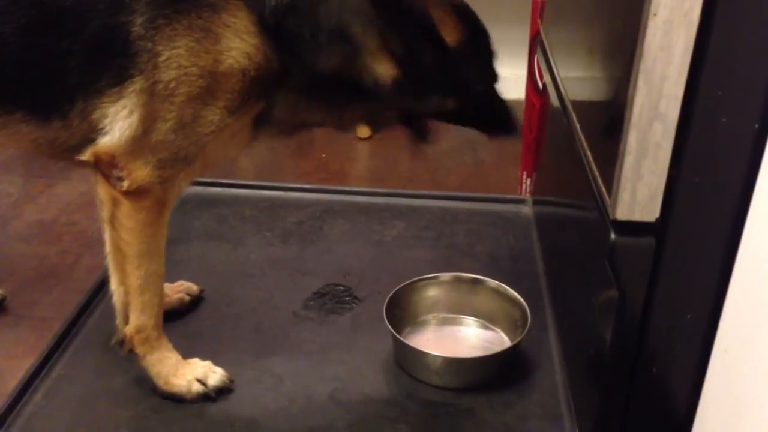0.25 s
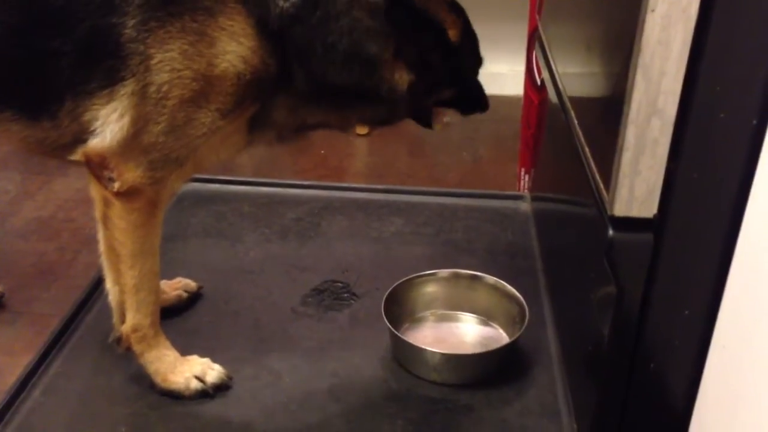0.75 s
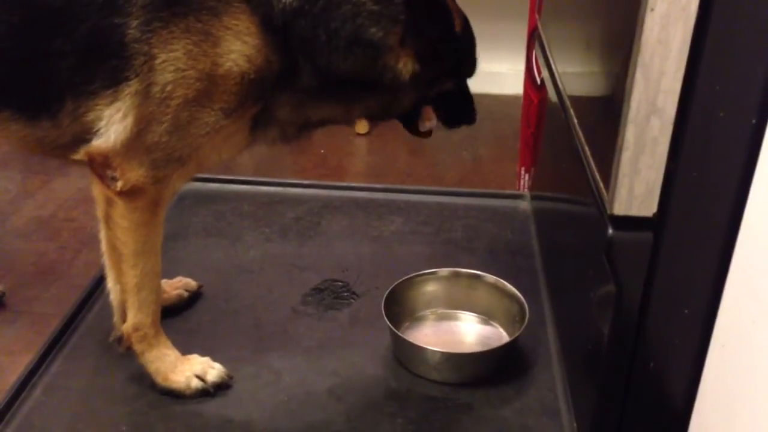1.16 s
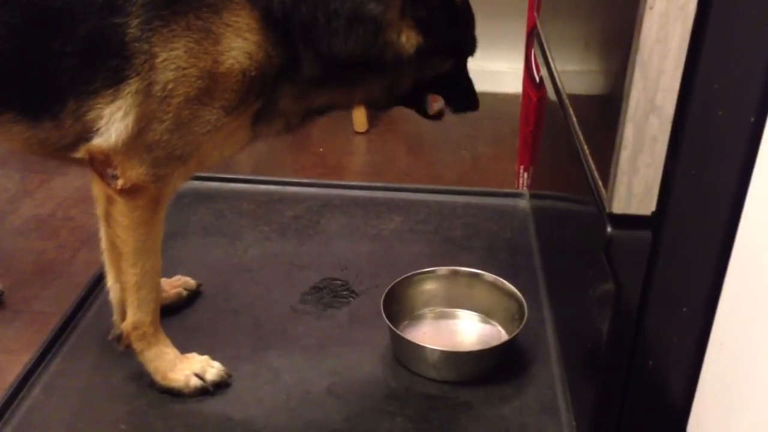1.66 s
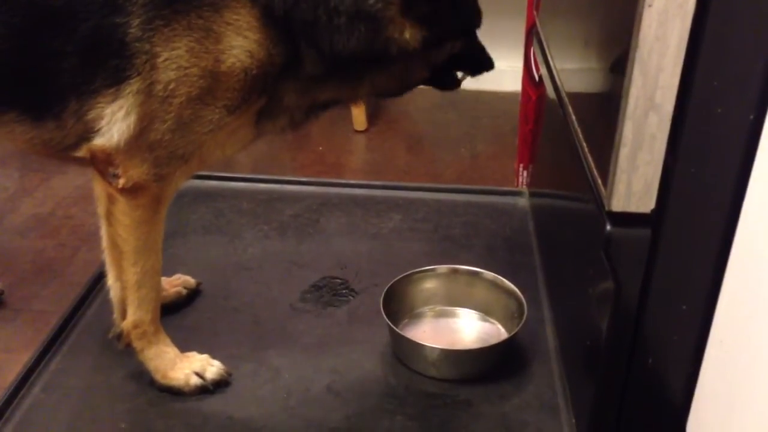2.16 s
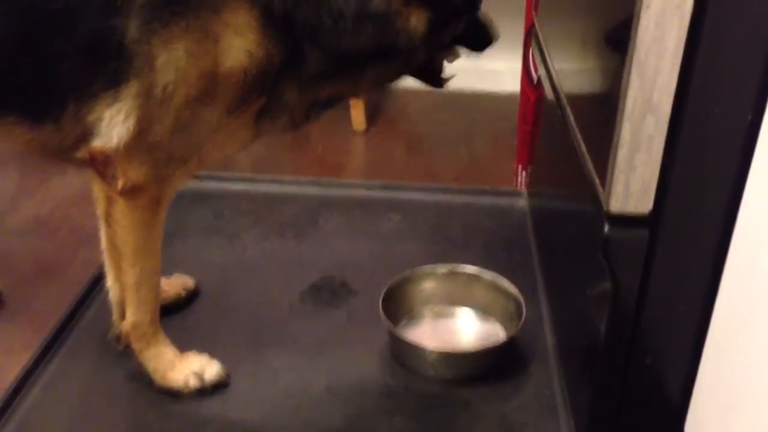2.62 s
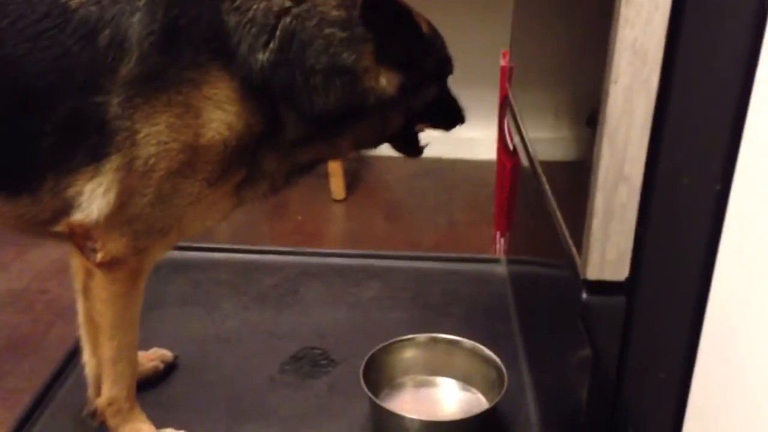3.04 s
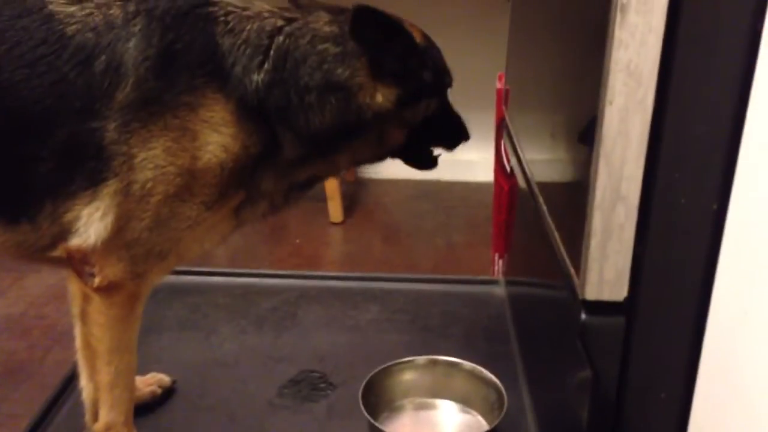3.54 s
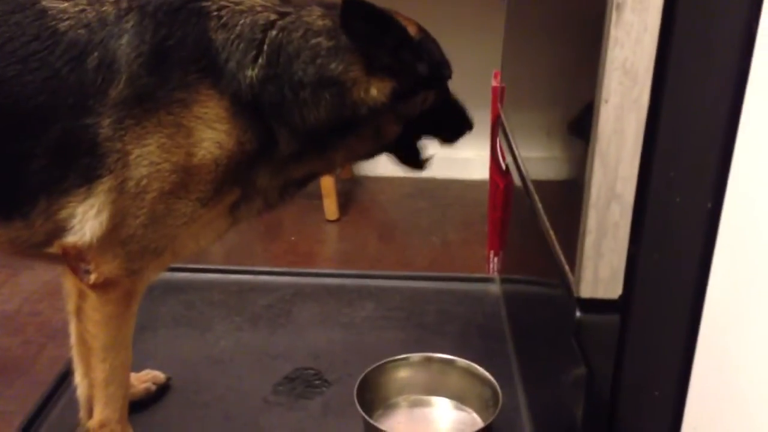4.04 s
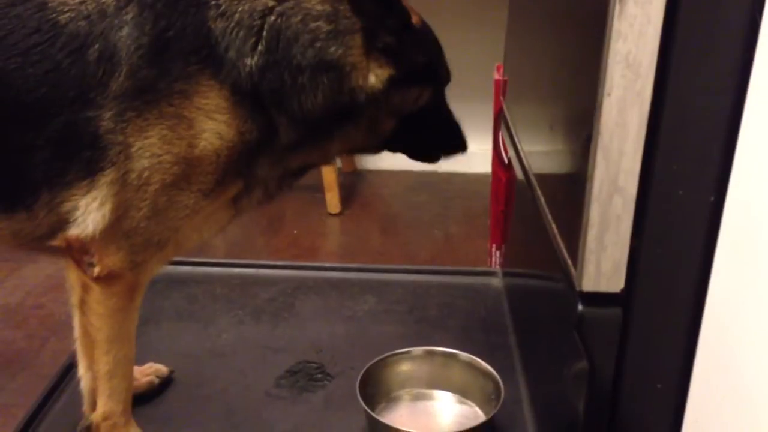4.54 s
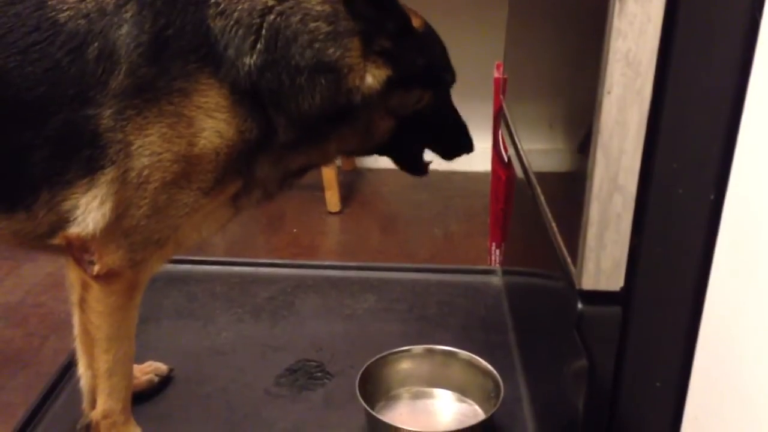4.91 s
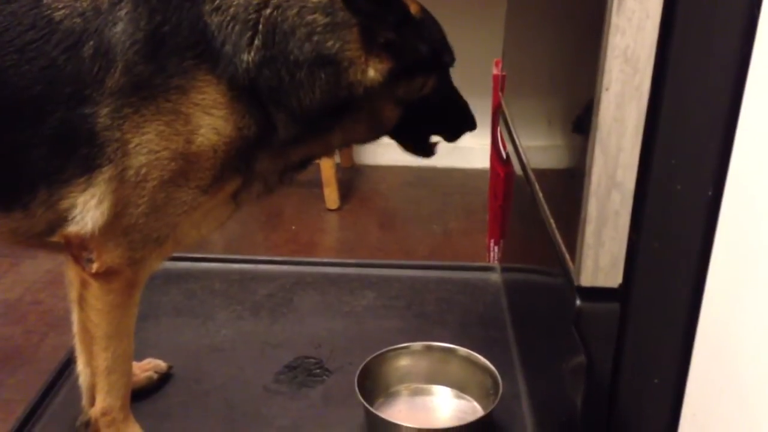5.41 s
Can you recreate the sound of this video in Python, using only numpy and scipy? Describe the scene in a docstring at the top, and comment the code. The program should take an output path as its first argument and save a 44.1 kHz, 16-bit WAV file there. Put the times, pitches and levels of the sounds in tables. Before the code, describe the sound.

A dog chews raw chicken close to the microphone in a small room with little echo. A soft, steady airy hum from a household appliance lies underneath throughout. Faint wet chewing opens, then at about 0.8 seconds bone starts to crack, peaking just before 1 second in the loudest crunch, with a dull thud of the jaws. Quiet saliva smacks follow, with a pop and a small crunch around 2.1 to 2.3 seconds. A strong cluster of splintering cracks comes from 2.7 to 2.9 seconds. Soft chewing and faint ticks near 3.3 seconds lead to another sharp crunch at 3.8. After a short lull, a wet pop and a lighter, squelchy bite arrive between 4.9 and 5.1 seconds. Around 5.6 seconds come a few suction pops of tongue and lips with one last soft bite.

```python
"""Dog chewing raw chicken

Close up in a small, quiet room, bones crunch in bursts of tiny fractures that ring the splinter and
the open mouth. The jaws thud shut on the meat; saliva fizzes and pops between bites.
Underneath sits a steady bed of air noise and mains hum from a household appliance."""
import sys
import numpy as np
from scipy import signal
from scipy.fft import rfft, irfft
from scipy.io import wavfile

SR = 44100
rng = np.random.default_rng(int(sys.argv[2]) if len(sys.argv) > 2 else 0)


def persist_wave(psi):
    """Save psi, clipped to +-1, as 16-bit WAV."""
    counts = np.round(np.clip(psi, -1, 1) * 32767).astype(np.int16)
    wavfile.write(sys.argv[1], SR, np.atleast_2d(counts).T)


N = 250488
HIT = 4096  # samples in a one-shot

# tone of the appliance's air noise: (frequency [Hz], relative level [dB])
AIR_SPECTRUM = [(18, -60), (30, -32), (75, -21), (108, -12), (249, -3), (379, -9), (410, -3.5), (709, -11),
                (787, -12), (1230, -14), (1330, -12.5), (1970, -16), (3070, -21.5), (4090, -22),
                (15500, -38)]
# resonant bumps and dips in that air noise: (centre [Hz], width [Hz], gain [dB])
AIR_RESONANCES = [(81, 30, -4.5), (116, 14, 1.5), (153.5, 33, 2), (291, 143, 3), (495, 187, -6),
                  (614, 44, 5), (880.5, 27, 6), (1229, 36, 7), (1890, 200, 2.5)]
# light chewing strokes and wet smacks: (middle [s], length [s], level [dB], pocket pitch [Hz])
CHEW_STROKES = [ (.18, .25, -67, 6000), (0.334, 0.077, -58.5, 3850), (0.618, 0.1, -61, 4000),
                (.75, 0.033, -54, 1590), (1.382, 0.035, -59.5, 6800), (1.60, 0.073, -55, 5700),
                (1.91, 0.15, -64.5, 5500), (2.25, 0.13, -57, 7400), (2.30, .045, -46.5, 3460),
                (2.321, .007, -51, 14400), (2.665, .14, -62, 4500), (3.214, .29, -63, 4500),
                (3.518, .15, -64, 4000), (4.508, .15, -70, 6500), (4.965, 0.2, -59.5, 4140), ]
# bone breaks: (time [s], length [s], snap level [dB], mouth pitch [Hz], mouth level [dB],
# splinter pitch [Hz], splinter level [dB])
BONE_CRACKS = [ (0.810, .004, -43, 1610, -47.5, 5000, -47.5), (0.891, 0.0064, -40, 1670, -52, 4300, -40),
               (0.8959, 0.005, -34, 1700, -39.5, 5030, -36), (0.9429, 0.0026, -25, 1040, -46, 8700, -29.5),
               (0.945, 0.0027, -22, 1063, -32, 4900, -35), (0.9474, 0.0029, -33, 2010, -30, 2680, -28),
               (1.016, 0.0055, -32.5, 1560, -44.5, 2980, -57), (2.181, 0.003, -49, 1840, -56, 3520, -59),
               (2.225, 0.0083, -46, 1290, -65, 3830, -50), (2.238, .005, -41, 1250, -67, 3850, -47),
               (2.721, 0.0024, -42, 1210, -50.5, 4770, -37.5), (2.765, 0.0094, -51, 1720, -41, 3130, -39.5),
               (2.825, 0.0074, -36, 1105, -38, 1720, -41.5), (2.848, 0.0081, -30, 1274, -32, 2450, -40),
               (2.86, 0.019, -36, 1150, -40.5, 1760, -41), (2.88, 0.0017, -50, 963, -38.5, 3000, -46),
               (3.271, 0.0088, -50, 1150, -51.5, 3670, -73), (3.353, 0.014, -55.5, 1510, -57, 3080, -59),
               (3.7853, 0.0061, -48, 1000, -47, 4600, -36), (3.835, 0.0065, -32.5, 968, -23.5, 4040, -48),
               (3.8536, 0.0038, -37.5, 940, -42, 2020, -45), (4.979, 0.0012, -49, 1940, -52, 4400, -68),
               (5.0502, 0.0083, -44.5, 1606, -41, 4500, -47), (5.054, 0.0036, -49, 695, -39.5, 3930, -39),
               (5.615, 0.006, -56, 990, -39, 2670, -57), ]
# colour of a fracture: (frequency [Hz], gain [dB])
SNAP_SPECTRUM = [(150, -25), (550, -6), (900, 1.5), (1500, -2), (2200, 5.5), (3300, 7), (5400, 4.5),
                 (7000, 3), (8400, 0.5), (9500, 0), (11500, -1), (16000, 10)]
# full bites: (time [s], thud level [dB], squeeze rise [s], squeeze level [dB], pocket pitch [Hz])
FULL_BITES = [ (0.945, -28.5, 0.041, -45.5, 2150), (2.238, -48, 0.015, -48, 3700),
              (2.853, -43.5, 0.013, -50, 1790), (3.836, -39.5, .012, -64, 1920),
              (5.054, -47, 0.0096, -40.5, 4700), (5.617, -48.5, 0.01, -64, 1880), ]
# suction pops of tongue, lips and saliva: (time [s], cavity pitch [Hz], level [dB], ring time [s])
SUCTION_POPS = [ (1.6555, 2130, -54.5, 0.0037), (2.0988, 1180, -42, 0.004), (4.8758, 1020, -41, 0.0065),
                (5.0117, 1900, -45, 0.0027), (5.596, 1060, -50.5, 0.0032), (5.6132, 996, -38, 0.007),
                (5.6242, 967, -37.5, 0.013), ]
# first reflections off the mat and the cabinet: (delay [s], gain [dB])
EARLY_REFLECTIONS = [(.0026, -7.5), (.0085, -4), (0.013, -11)]
# the room's tail: (band [Hz], time to fall 60 dB [s], level against the direct sound [dB])
TAIL_BANDS = [(198, 0.17, -3.5), (470, 0.25, 2), (1130, 0.31, -2.5), (1920, 0.3, 2), (3970, 0.4, -5.5),
              (7960, 0.32, -6), (14000, 0.22, -8.5)]


def undb(db):
    """Decibels to gain."""
    return 10 ** (np.asarray(db) / 20)


def level(x, db):
    """Set the rms level of a steady sound."""
    return x * undb(db) / np.sqrt(np.mean(x ** 2))


def strength(x, db):
    """Set the energy of a one-shot, as its level if packed into 10 ms."""
    return x * undb(db) / np.sqrt(np.sum(x ** 2) / (SR / 100) + 1e-18)


def add(out, start_s, x):
    """Mix a sound in at a given time."""
    i = max(int(start_s * SR), 0)
    out[i:i + len(x)] += x[:max(len(out) - i, 0)]


def along(points, hz):
    """Read (Hz, value) points on a log-frequency axis."""
    f, value = np.transpose(points)
    return np.interp(np.log(hz + 1), np.log(f), value)


def ring(x, hz, width_hz):
    """One damped resonance."""
    hz = min(hz, 0.45 * SR)
    return signal.lfilter(*signal.iirpeak(hz, hz / width_hz, fs=SR), x)


def causal(db):
    """The sharpest impulse response that has this spectrum."""
    cepstrum = irfft(np.log(undb(db)))
    half = len(cepstrum) // 2
    cepstrum[1:half] *= 2
    cepstrum[half + 1:] = 0
    return irfft(np.exp(rfft(cepstrum)))


def clicks(count, per_s, spread_db):
    """Randomly timed clicks of either sign, a few much louder than the rest."""
    timing, loudness, polarity = rng.random((count, 3)).T
    size = undb(-spread_db * np.log(loudness * 0.98 + 0.02))
    return (timing < per_s / SR) * size * np.sign(polarity - 0.5)


def swell(t, rise_s):
    """An envelope that builds to its peak at rise_s and dies away."""
    return (t / rise_s * np.exp(1 - t / rise_s)) ** 2


def tone(t, hz, rise_s, fall_s):
    """A resonance pushed for rise_s that then dies away."""
    return np.sin(2 * np.pi * hz * t) * (1 - np.exp(-(t / rise_s) ** 2)) * np.exp(-t / fall_s)


def appliance(hum_hz=120):
    """The bed: steady air noise with a few soft resonances, and a faint mains hum."""
    t, hz = np.arange(N) / SR, np.fft.rfftfreq(N, 1 / SR)
    bumps_db = sum(db * np.exp(-2 * ((hz - f) / width) ** 2) for f, width, db in AIR_RESONANCES)
    colour = undb(along(AIR_SPECTRUM, hz) + bumps_db)
    air = irfft(rfft(rng.standard_normal(N)) * colour, N)
    hum = np.sin(2 * np.pi * hum_hz * t)
    return level(air, db=-51) + level(hum, db=-74)


def squelch(count, hz, width_hz):
    """Tiny films of saliva and fibres of meat burst, ringing the pocket between the teeth."""
    bursts = clicks(count, per_s=3400, spread_db=3)
    return ring(ring(bursts, hz, width_hz), hz, width_hz=hz)


def chews():
    """Saliva fizzes as the pressure of each light stroke comes and goes."""
    out, count = np.zeros(N), SR // 2
    for middle, length, db, pocket_hz in CHEW_STROKES:
        start = max(middle - count / SR / 2, 0)
        t = start + np.arange(count) / SR
        pressure = np.exp(-4.5 * ((t - middle) / length) ** 2)
        fizz = squelch(count, pocket_hz, width_hz=0.74 * pocket_hz)  # a half-open mouth rings broadly
        add(out, start, level(fizz, db) * pressure)
    return out


def snap(fractures, edge_hz):
    """The colour of breaking bone; meat and lips around the break muffle the top."""
    hz = np.fft.rfftfreq(HIT, 1 / SR)
    muffle_db = 10 * np.log10(1 + (hz / edge_hz) ** 8)
    colour = causal(along(SNAP_SPECTRUM, hz) - muffle_db)
    return signal.fftconvolve(fractures, colour)[:len(fractures)]


def cracks():
    """Each break is an avalanche of micro-fractures; its release rings the splinter and the mouth."""
    out, t = np.zeros(N), np.arange(HIT) / SR
    for start, length, snap_db, mouth_hz, mouth_db, splinter_hz, splinter_db in BONE_CRACKS:
        fractures = clicks(HIT, per_s=12000, spread_db=3.5) * swell(t, rise_s=0.42 * length)
        # a small, high splinter also gives a brighter snap
        attack = snap(fractures, edge_hz=9400 * (splinter_hz / 4600) ** 0.21)
        splinter = ring(fractures, splinter_hz, width_hz=0.18 * splinter_hz)
        splinter = ring(splinter, splinter_hz, width_hz=0.66 * splinter_hz)
        # the mouth cavity has a strong first resonance and a weaker second one
        mouth = sum(gain * tone(t, hz, rise_s=0.29 * length, fall_s=2.6 / hz)
                    for hz, gain in [(mouth_hz, 1), (1.744 * mouth_hz, 0.3)])
        body = strength(splinter, splinter_db) + strength(mouth, mouth_db)
        add(out, start, strength(attack, snap_db) + body)
    return out


def bites(jaw_hz=230, crumbs_vs_meat_db=-8.5):
    """The jaws shut with a thud, then squeeze the meat and grind the crumbs of bone in it."""
    out, count = np.zeros(N), SR // 2
    t = np.arange(count) / SR
    for start, thud_db, rise_s, squeeze_db, pocket_hz in FULL_BITES:
        thud = np.sin(2 * np.pi * jaw_hz * t) * swell(t, rise_s=0.0034)
        meat = squelch(count, pocket_hz, width_hz=0.12 * pocket_hz)
        crumbs = snap(clicks(count, per_s=450, spread_db=5), edge_hz=4500)
        squeeze = level(meat, squeeze_db) + level(crumbs, squeeze_db + crumbs_vs_meat_db)
        add(out, start, strength(thud, thud_db) + squeeze * swell(t, rise_s))
    return out


def pops():
    """A wet seal parts and the air pocket behind it rings, bending up a little as it opens."""
    out, t = np.zeros(N), np.arange(HIT) / SR
    for start, cavity_hz, db, ring_s in SUCTION_POPS:
        pitch = cavity_hz * (1 + 0.14 * (np.tanh(t / ring_s) - 0.5))
        pop = np.sin(2 * np.pi * np.cumsum(pitch) / SR) * swell(t, rise_s=0.4 * ring_s)
        add(out, start, strength(pop, db))
    return out


def tail(build_s=0.0014):
    """A short, diffuse room tail that dies fastest in the lows and the highs."""
    count = SR // 2
    t, hz = np.arange(count) / SR, np.fft.rfftfreq(count, 1 / SR)
    noise, response = rfft(rng.standard_normal(count)), np.zeros(count)
    centres_hz = np.array(TAIL_BANDS)[:, 0]
    for (_, t60, db), share in zip(TAIL_BANDS, np.eye(len(TAIL_BANDS))):
        band = irfft(noise * along(np.c_[centres_hz, share], hz), count)
        decay = undb(-60 * t / t60) * (1 - np.exp(-(t / build_s) ** 2))
        response += undb(db) * band * decay / np.sqrt(np.sum(decay ** 2))
    return response


def room(direct, outward, dull_hz=3500):
    """Direct sound, a few dull reflections, and a tail for each direction the sound leaves the dog."""
    hz = np.fft.rfftfreq(HIT, 1 / SR)
    bounce = causal(-10 * np.log10(1 + (hz / dull_hz) ** 2))
    early = np.r_[1.0, np.zeros(HIT)]
    for delay, db in EARLY_REFLECTIONS:
        add(early, delay, undb(db) * bounce)
    diffuse = sum(signal.fftconvolve(x, tail())[:N] for x in outward) / np.sqrt(len(outward))
    return signal.fftconvolve(direct, early)[:N] + diffuse


def scene():
    """The mono mix: wet mouth sounds and bone crunch in the room, over the appliance bed."""
    wet = pops() + bites() + chews()
    # fractures face every way, so each direction gets its own crackle
    dog = room(direct=cracks() + wet, outward=[cracks() + wet for _ in range(3)])
    # a high-pass trims deep bass from the chewing sounds
    low_cut = signal.butter(4, 142, "high", fs=SR, output="sos")
    return (signal.sosfilt(low_cut, dog) + appliance())[None]


def record(dry):
    """A steep low-pass removes the extreme top above about 15 kHz."""
    high_cut = signal.ellip(10, 0.2, 70, 15450, fs=SR, output="sos")
    return signal.sosfilt(high_cut, dry)


dry = scene()
out = record(dry)
persist_wave(out)
```